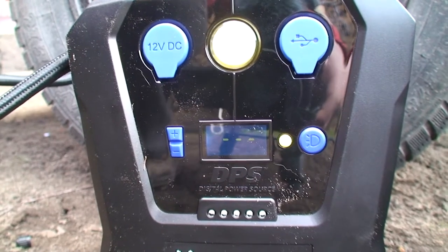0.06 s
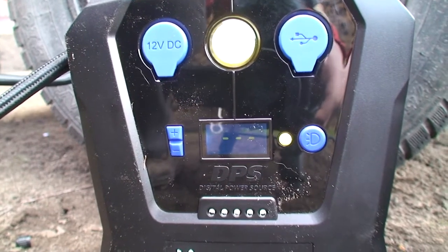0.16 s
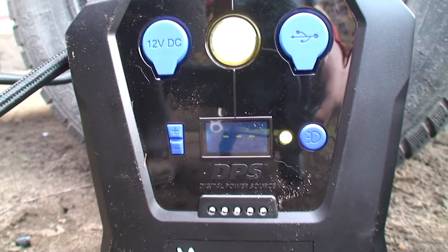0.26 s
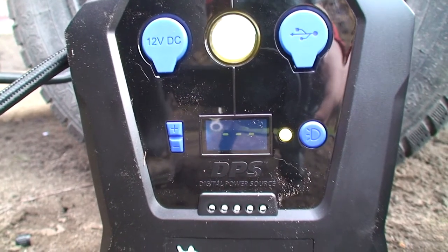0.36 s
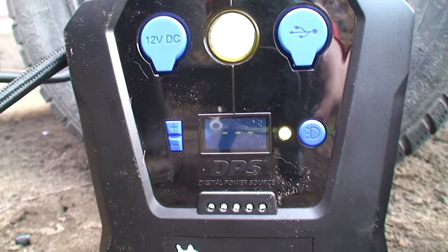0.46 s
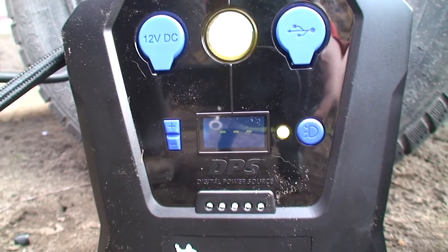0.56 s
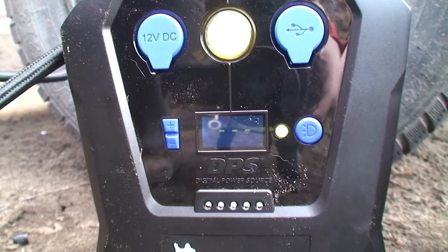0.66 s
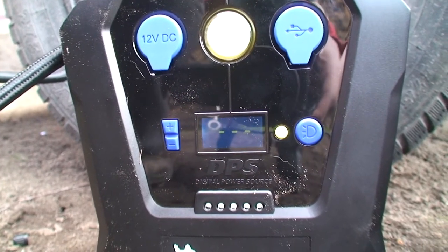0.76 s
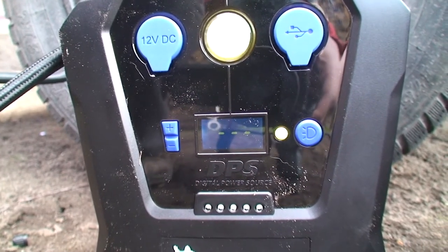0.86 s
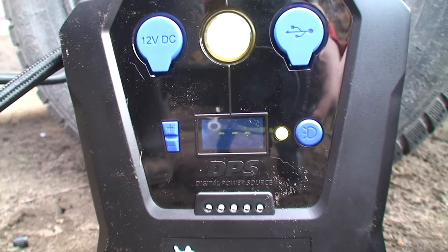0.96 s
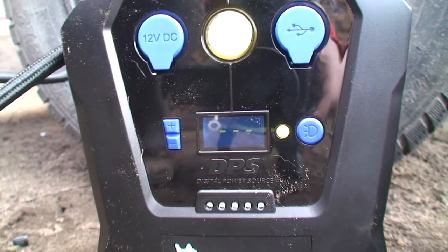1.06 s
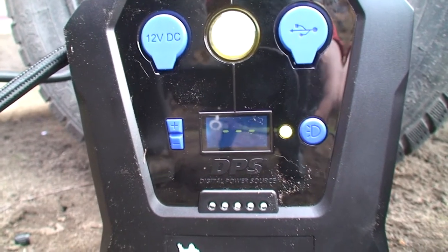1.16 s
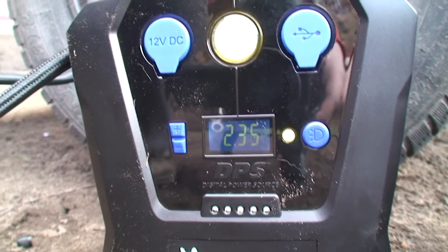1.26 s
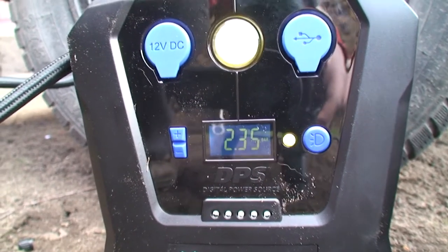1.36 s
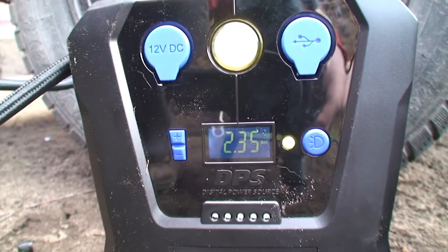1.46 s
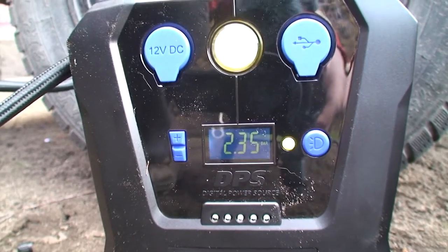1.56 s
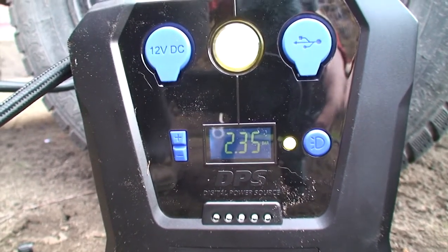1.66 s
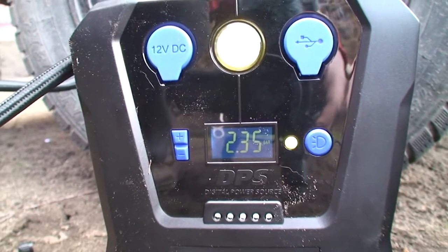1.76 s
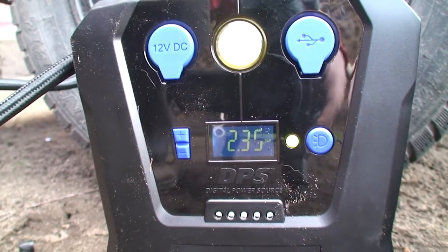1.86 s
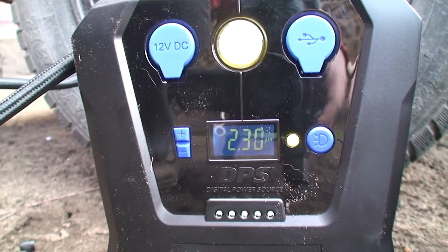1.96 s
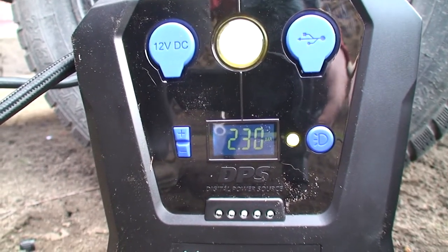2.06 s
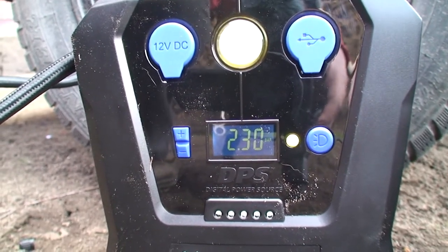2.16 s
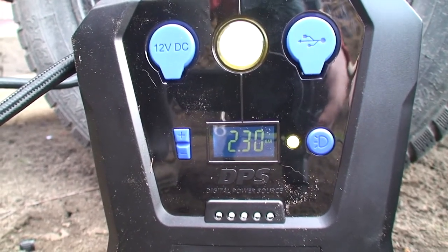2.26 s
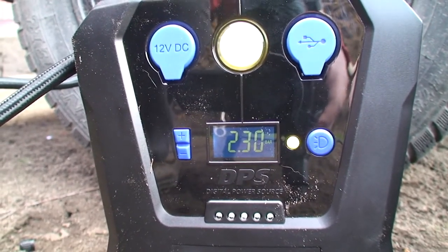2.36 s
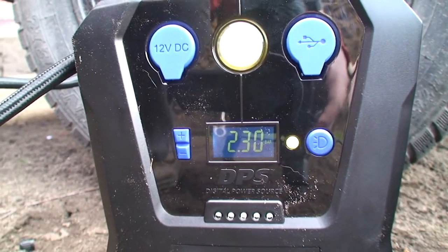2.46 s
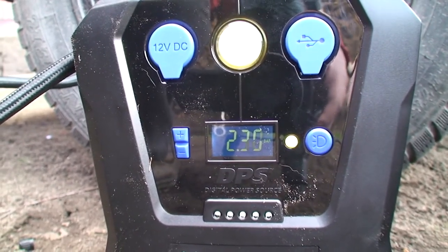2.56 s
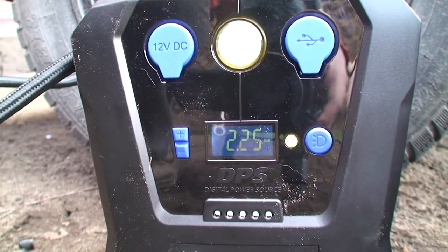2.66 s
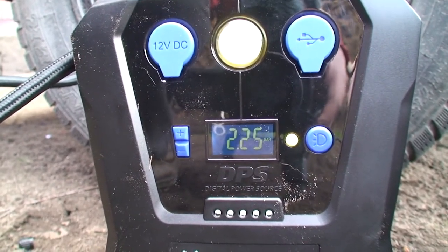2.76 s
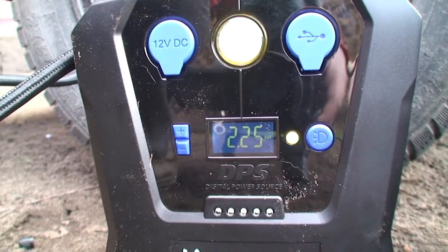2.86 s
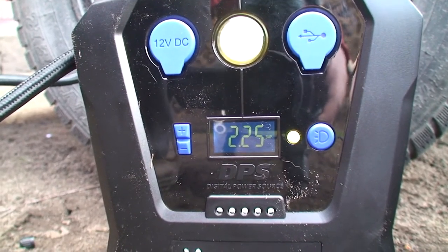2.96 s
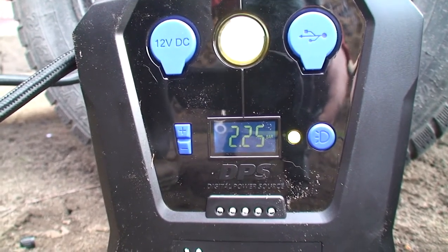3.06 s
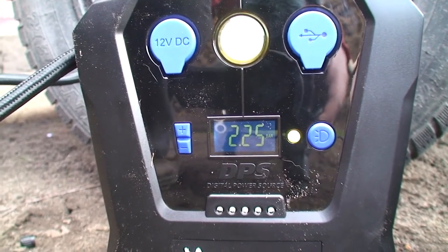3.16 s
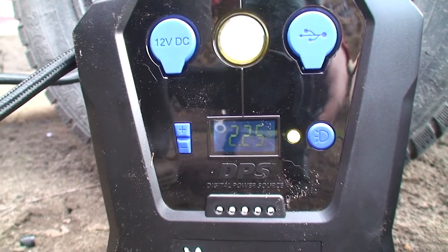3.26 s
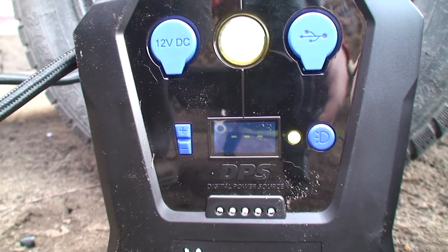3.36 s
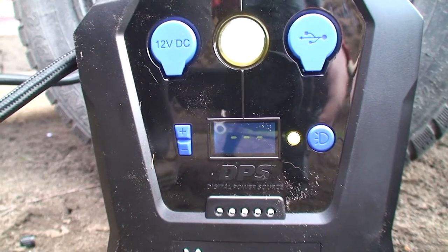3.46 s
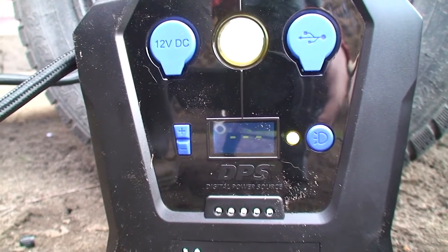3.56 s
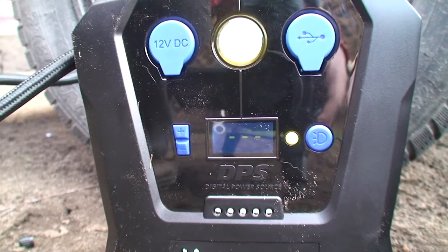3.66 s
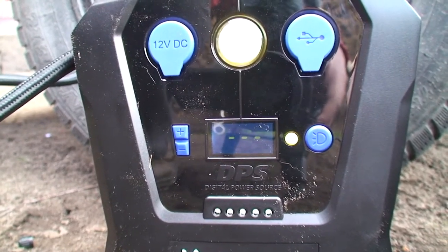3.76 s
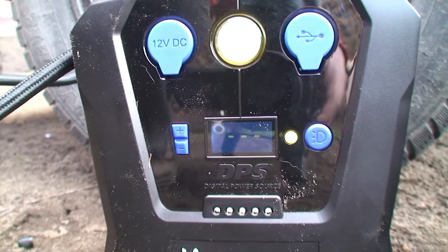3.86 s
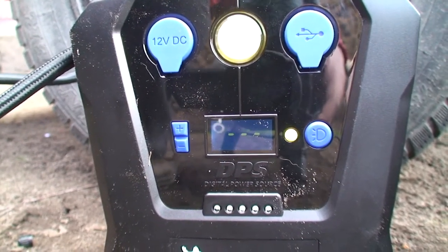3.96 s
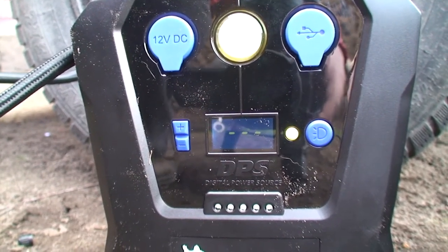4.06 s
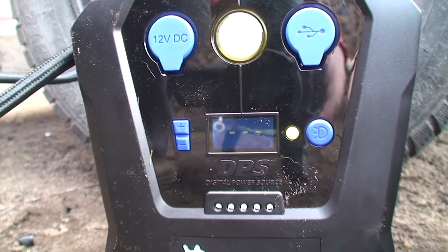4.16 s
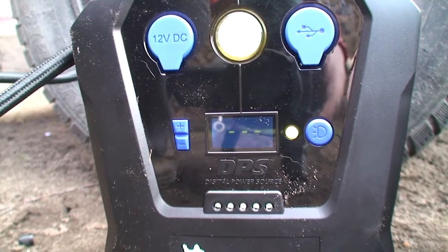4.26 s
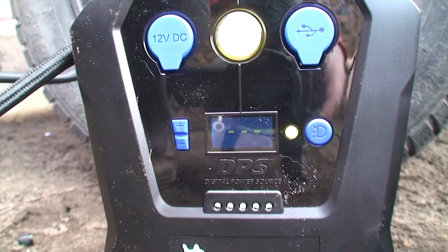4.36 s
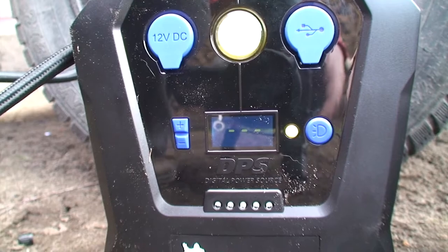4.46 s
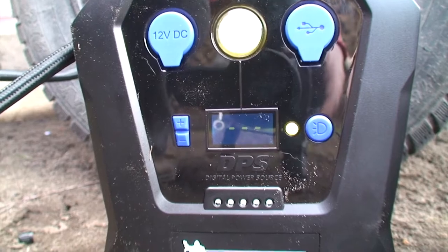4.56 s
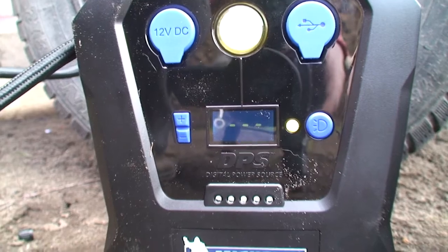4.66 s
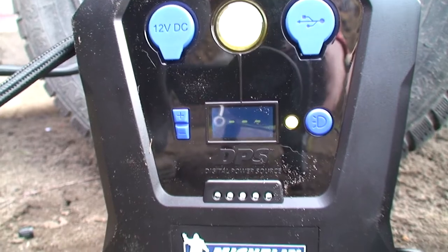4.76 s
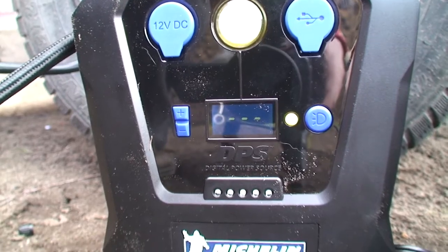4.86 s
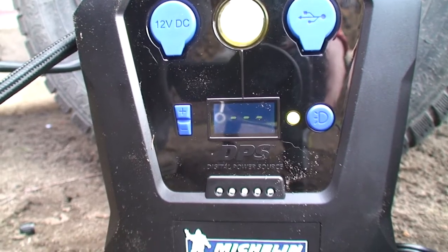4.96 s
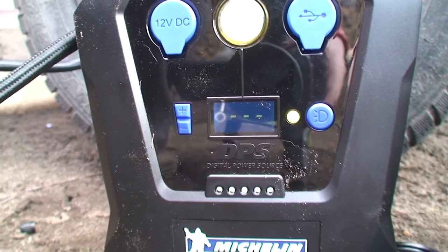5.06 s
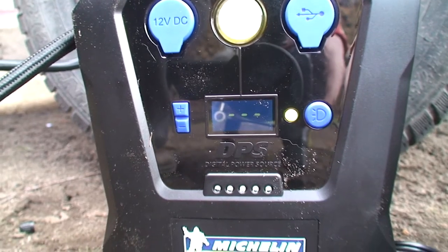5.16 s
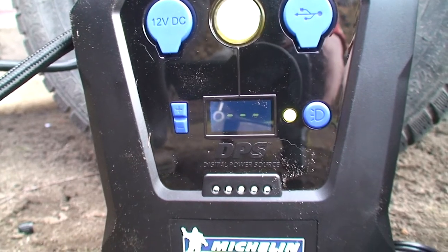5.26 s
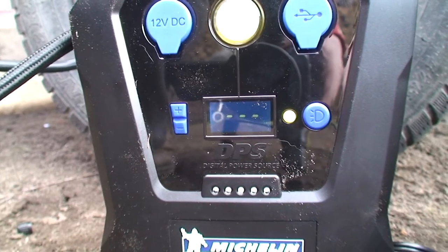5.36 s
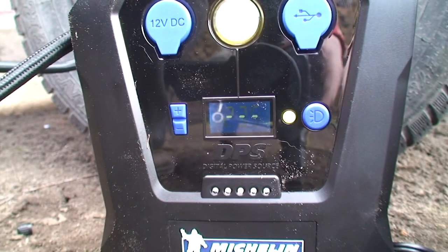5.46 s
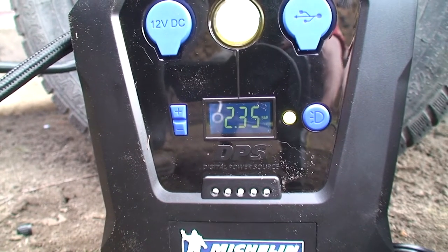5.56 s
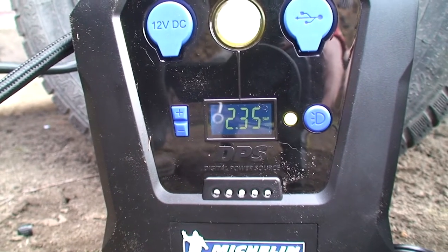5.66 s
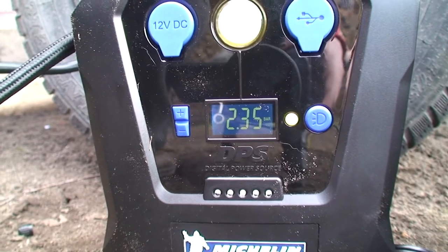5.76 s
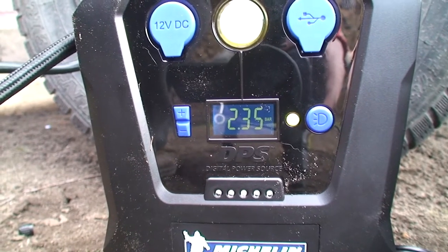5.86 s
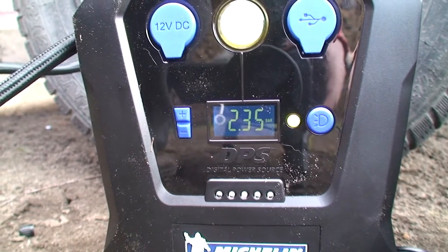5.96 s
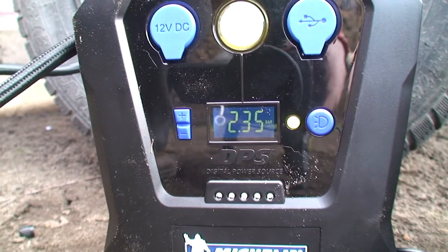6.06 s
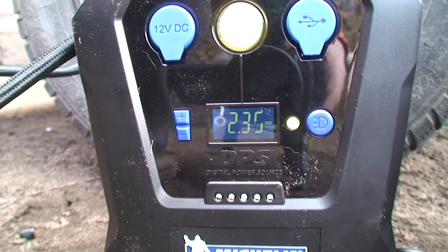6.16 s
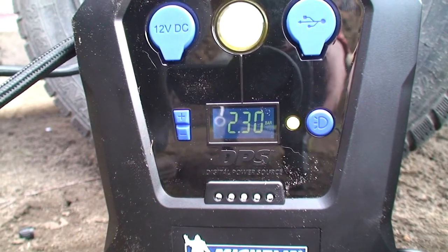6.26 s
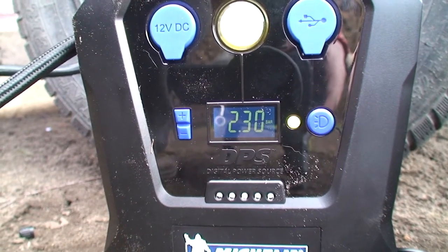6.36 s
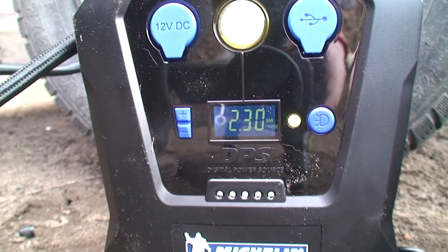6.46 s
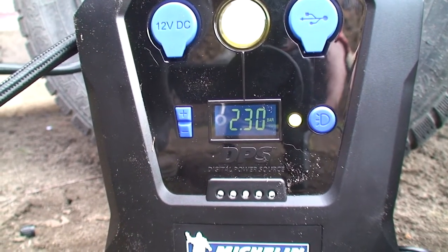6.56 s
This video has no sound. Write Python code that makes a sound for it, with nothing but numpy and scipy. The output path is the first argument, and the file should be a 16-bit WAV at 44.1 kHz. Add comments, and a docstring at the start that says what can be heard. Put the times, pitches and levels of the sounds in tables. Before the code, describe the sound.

Outdoors, a portable air pump buzzes and chatters in two steady runs, each coasting to rest with a brief whirr and clacks.

```python
"""Small electric tyre compressor

It runs close by outdoors, stops, runs again and coasts to rest. A motor geared 23:5 drives one piston:
each stroke knocks, and gears and valves chatter through the plastic case. Pitch and loudness follow the
crank, which spins up at switch-on and is braked by the tyre's pressure at switch-off. The pauses reveal
open air, a low hum, a distant bird and a faint rustle. Two soft thumps fall in the second run."""
import sys
import numpy as np
from scipy import signal
from scipy.fft import rfft, irfft, next_fast_len
from scipy.io import wavfile

SR = 44100
rng = np.random.default_rng(int(sys.argv[2]) if len(sys.argv) > 2 else 0)


def unload_wav(signal):
    """Save mono or channel-first audio to the path in sys.argv[1] as 16-bit WAV at rate SR, clipped to [-1, 1]."""
    wavfile.write(
        sys.argv[1],
        SR,
        np.round(np.clip(np.atleast_2d(signal).T, -1, 1) * 32767).astype(np.int16),
    )


N = 291501
TIME = np.arange(N) / SR

# The motor's two runs: on_s, off_s, at_rest_s, speed_turns_per_s, start_position_turns
RUNS = [(-1, 1.0684, 1.298, 43.878, 3.42), (3.2235, 5.3303, 5.603, 44.021, .215)]


def amp(db):
    """Turns decibels into a multiplier."""
    return np.exp(np.asarray(db) * (np.log(10) / 20))


def unit(x):
    """Scales x to an average (rms) level of 1."""
    return x / np.sqrt(np.mean(x ** 2) + 1e-20)


def running_level(x):
    """Scales x to an average (rms) level of 1 while the motor runs."""
    powered = np.any([(TIME > on) & (TIME < off) for on, off, *_ in RUNS], axis=0)
    return x / np.sqrt(np.mean(x[powered] ** 2))


def along(points, hz):
    """Reads between (pitch_hz, value) points, with octaves evenly spaced."""
    pitches, values = np.transpose(points)
    return np.interp(np.log(hz + 1), np.log(pitches + 1), values)


def filtered(x, response):
    """Scales each frequency in x by response(hz)."""
    size = next_fast_len(N + 4096, real=True)
    hz = np.fft.rfftfreq(size, 1 / SR)
    gain = np.repeat(response(hz[::8]), 8, axis=-1)[..., :len(hz)]
    return irfft(rfft(x.astype(np.float32), size) * gain, size)[..., :N]


def ringing(x, gain, size=16384):
    """Plays x through a body that rings most where gain(hz) is high."""
    hz = np.fft.rfftfreq(size, 1 / SR)
    cepstrum = irfft(np.log(np.maximum(gain(hz), 1e-6)))
    # folding makes the ring follow each hit, never lead it
    cepstrum[1:size // 2] *= 2
    cepstrum[size // 2 + 1:] = 0
    ring = irfft(np.exp(rfft(cepstrum)))[:size // 2]
    return signal.fftconvolve(x, ring)[:N]


def widen(mid, side, spread):
    """Makes left and right from a sound and its scattered part."""
    side = filtered(side, lambda hz: amp(along(spread, hz)))
    return np.array([mid + side, mid - side])


def wobble(rate):
    """A random curve with rate new values a second."""
    knots = rng.standard_normal(int(N / SR * rate) + 2)
    return np.interp(TIME * rate, np.arange(len(knots)), knots)


def sine(cycles):
    """A sine wave from its count of cycles."""
    return np.sin((2 * np.pi * (cycles - np.floor(cycles))).astype(np.float32))


def note(length_s, hz):
    """A tone that swells and fades."""
    t = np.arange(int(length_s * SR)) / SR
    return np.sin(np.pi * t / length_s) * sine(hz * t)


def add(track, start_s, sound):
    """Lays a short sound into the track."""
    track[round(start_s * SR):][:len(sound)] += sound


def crank(spin_up_s=.0338, sag_hz_per_s=.174, brake_s=.1057, brake_shape=1.76):
    """The crank's turns so far, share of speed reached since switch-on and share kept since switch-off."""
    turns, reached, kept = np.zeros((3, N))
    for on, off, _, speed, position in RUNS:
        t = np.arange(N - round(on * SR)) / SR
        rise = 1 - np.exp(-t / spin_up_s)
        fall = np.exp(-(np.maximum(t + on - off, 0) / brake_s) ** brake_shape)  # gentle, then fast
        loaded_speed = speed - sag_hz_per_s * t  # slows as the pressure builds
        travel = position + np.cumsum(loaded_speed * rise * fall) / SR
        span = min(len(t), N)
        turns[-span:], reached[-span:], kept[-span:] = travel[-span:], rise[-span:], fall[-span:]
    return turns, reached, kept


def piston(turns, speed, speed_power=0.72, scatter_db=-0.5, lag_radians=.3):
    """One push a turn, softer at low speed, rings the low notes of the case."""
    # How the case answers a stroke: pitch_hz, relative_db
    knock = [(44, -50), (88, -40), (131, -41.5), (175, -39.5), (219, -38.5), (262, -46), (306, -39),
             (350, -36.5), (394, -31), (438, -26), (481, -35), (525, -28.5), (569, -39), (612, -40),
             (656, -57), (700, -26.5), (744, -45.5), (788, -44.5), (831, -40.5), (875, -41.5)]
    strokes = np.flatnonzero(np.diff(np.floor(turns)) > 0)
    pushes = np.zeros(N)
    pushes[strokes] = speed[strokes] ** speed_power * amp(scatter_db * rng.standard_normal(len(strokes)))
    lags = lag_radians * rng.standard_normal(len(knock))  # the panels move slightly out of step
    pushes = filtered(pushes, lambda hz: np.exp(1j * np.interp(hz, np.transpose(knock)[0], lags)))
    low_band = lambda hz: 1 / np.sqrt((1 + (hz / 950) ** 20) * (1 + (36 / (hz + 1)) ** 8))
    return running_level(ringing(pushes, lambda hz: amp(along(knock, hz)) * low_band(hz)))


def case(hz):
    """How strongly the case and cylinder ring at each frequency."""
    # Their ringing notes: pitch_hz, half_width_hz, relative_db
    resonances = [(167, 100, -16), (380, 42, -10), (533, 99, 0), (776, 59, 2.5), (1086, 110, -0.5),
                  (1141, 29, -4), (1290, 90, -1), (1582, 100, -2.2), (1720, 390, -3.5), (2060, 170, -4),
                  (2280, 49, -2.5), (2552, 110, -3), (2737, 120, -4), (3057, 62, -1.5), (3372, 85, -6),
                  (3575, 38, -1.5), (3783, 130, -2), (4050, 95, -1.5), (4346, 140, -8), (4490, 120, -14.5),
                  (4690, 280, -9), (5490, 320, -11.5), (6134, 520, -8.5), (7340, 986, -19.5),
                  (8610, 397, -21.5), (9560, 220, -19), (10650, 740, -25), (14480, 170, -25),
                  (14710, 5600, -32.5), (15340, 290, -30.5)]
    peaks = (amp(db) / (1 + ((hz - centre) / width) ** 2) for centre, width, db in resonances)
    return np.sqrt(sum(peak ** 2 for peak in peaks))


def surface(turns, count, size=1024, stretch=8):
    """A rough surface that comes round again after count turns of the crank."""
    ripples = np.exp(2j * np.pi * rng.random(count * size // 2))
    profile = unit(irfft(ripples, count * size * stretch))
    return profile[(turns * size * stretch).astype(int) % len(profile)]


def chatter(turns, crank_db=-5.5, teeth_db=-3.5, air_db=-6, rasp_hz=950, low_hz=110):
    """The crank's fine rasp repeats each turn, the gear teeth every five; rushing air never repeats."""
    rasp = filtered(surface(turns, count=1), lambda hz: 1 / np.sqrt(1 + (rasp_hz / (hz + 1)) ** 8))
    teeth = surface(turns, count=5)
    rub = amp(crank_db) * rasp + amp(teeth_db) * teeth + amp(air_db) * rng.standard_normal(N)
    radiated = lambda hz: case(hz) / np.sqrt(1 + (low_hz / (hz + 1)) ** 4)  # small case, little bass
    return running_level(ringing(rub, radiated))


def gear_whine(turns, waver_db=0.1, lag_turns=.03, play_turns=.0012, throb_below=16):
    """Tones locked to the shafts: low ones swell together each stroke; loose gears blur the high ones."""
    # The gears' tones: multiple_of_crank_speed, relative_db
    tones = [(11.6, -42), (12.8, -45), (13.8, -30), (14.8, -29.5), (15.8, -31.5), (16.4, -32.5),
             (16.6, -44.5), (16.8, -39.5), (18.4, -36.5), (25.8, -36.5), (27.6, -32), (28.8, -33),
             (37, -41), (38, -36), (39, -31), (43, -35), (52, -34.5), (58, -36), (81, -32.5), (100, -30)]
    angle = turns - lag_turns + play_turns * wobble(40)
    shared_phase = rng.random()
    tone = lambda multiple: sine(multiple * angle + shared_phase + rng.random() * (multiple > throb_below))
    return np.sqrt(2) * sum(amp(db + waver_db * wobble(20)) * tone(multiple) for multiple, db in tones)


def flare(x, turns, gear_ratio=23 / 5, tight_turns=0.78, size=512):
    """Parts of the sound flare each turn, most when the small off-centre gear presses tightest."""
    # The flares: position_turns, half_width_turns, centre_hz, half_width_octaves, lift_db, sway_share
    flares = [(.9, .1, 1600, .35, 6, .25), (.94, .06, 3850, .3, 6, .05), (.62, .3, 4050, .12, 8.5, .1),
              (.7, .17, 6100, .3, 7, .2), (.74, .1, 2400, .22, 6.5, .3)]
    angle = np.arange(5 * size) / size  # the pattern spans five turns
    place = (turns * size).astype(int) % len(angle)
    pressure = np.cos(2 * np.pi * (gear_ratio * angle - tight_turns))
    out = x.copy()
    for position, width, centre_hz, octaves, lift_db, sway in flares:
        gate = np.exp(-(((angle - position + .5) % 1 - .5) / width) ** 2)
        swell = unit(1 + (amp(lift_db) - 1) * gate * (1 + sway * pressure))
        band = filtered(x, lambda hz: np.exp(-(np.log2((hz + 1) / centre_hz) / octaves) ** 2))
        out += (swell - 1)[place] * band
    return out


def worn_teeth(turns, at_turns=.86, db=-12, ring_hz=1625, fade_s=0.057, scatter_db=1.5):
    """One worn pair of teeth meets every fifth turn and pings the cylinder."""
    meetings = np.flatnonzero(np.diff(np.floor((turns + 1 - at_turns) / 5)) > 0)
    t = np.arange(SR // 10) / SR
    ping = amp(-60 * t / fade_s) * (1 - np.exp(-t * ring_hz / 2)) * sine(ring_hz * t)
    track = np.zeros(N)
    for at, scatter in zip(meetings, rng.standard_normal(len(meetings))):
        add(track, at / SR, amp(db + scatter_db * scatter) * ping)
    return track


def gear_load(turns, reached, kept, slack_db=32, bite_at_turns=.62, bite_width_turns=0.17):
    """Faster gears are louder; as they coast, the chatter breaks into one burst a turn."""
    bite = np.exp(-(((turns - bite_at_turns + .5) % 1 - .5) / bite_width_turns) ** 2)
    gaps = amp(-slack_db * (1 - kept) ** 2.2 * (1 - bite))
    return reached ** 1.5 * kept ** 0.6 * gaps


def compressor(knock_db=-22.0, chatter_db=-16.5, whine_db=-2.0):
    """The crank drives knock, chatter, whine and ping; the flares fade as it coasts."""
    turns, reached, kept = crank()
    load = gear_load(turns, reached, kept)
    plain = amp(chatter_db) * chatter(turns) + amp(whine_db) * gear_whine(turns)
    gears = kept * flare(plain, turns) + (1 - kept) * plain
    direct = amp(knock_db) * piston(turns, reached * kept) + load * (gears + worn_teeth(turns))
    scattered = load * amp(chatter_db) * chatter(turns)
    return np.array([direct, scattered])


def free_rotor(db=-15, fade_db_per_s=102, stop_db_per_s=419.5, attack_s=0.12, attack_shape=4.2):
    """Loudness of the whirr: it rises after switch-off, fades, and dies once the rotor rests."""
    level = np.zeros(N)
    for _, off, rest, *_ in RUNS:
        coasting, resting = np.maximum(TIME - off, 0), np.maximum(TIME - rest, 0)
        attack = 1 - np.exp(-(coasting / attack_s) ** attack_shape)
        level += attack ** 2 * amp(db - fade_db_per_s * coasting - stop_db_per_s * resting)
    return level


def whirr(treble_hz=2200, treble_power=1.3, flutter_db=2.5):
    """With the power off, the motor's rotor whirrs on unevenly, duller as it fades."""
    # Tone colour of the whirr: pitch_hz, relative_db
    colour = [(88, -51), (150, -24.5), (283, -10.5), (364, -4), (441, -13), (515, -1.5), (757, -1),
              (972, -15), (1510, -5.5), (1840, -18.5), (3540, -22.5), (3820, -25), (4460, -22.5),
              (7500, -37), (15000, -50.5)]
    level = free_rotor() * amp(flutter_db * wobble(130))
    treble_level = level.max() * (level / level.max()) ** treble_power
    noise = unit(filtered(rng.standard_normal((2, N)), lambda hz: amp(along(colour, hz))))
    treble = filtered(noise, lambda hz: 1 / (1 + (treble_hz / (hz + 1)) ** 4))
    return level * (noise - treble) + treble_level * treble


def loose_parts(thin_hz=500):
    """Loose parts clack against the case as the piston starts or comes to rest."""
    # The clacks: start_s, level_db, fade_s (to fall 60 dB), dull_above_hz
    clacks = [(1.126, -14.5, .07, 2996), (1.168, -20.5, 0.055, 2192), (1.197, -34, .06, 2477),
              (1.356, -51, .09, 1000), (3.2265, -33, .08, 1830), (5.4, -15, .075, 3210),
              (5.4565, -16, .04, 1987), (5.482, -25.5, 0.12, 3000), (5.6295, -42, .055, 2588)]
    sound = np.zeros((2, N))
    t = np.arange(SR // 10) / SR
    for start_s, db, fade_s, dull_hz in clacks:
        cut = lambda hz: np.sqrt((1 + (hz / dull_hz) ** 6) * (1 + (thin_hz / (hz + 1)) ** 4))
        for track in sound:
            burst = amp(db - 60 * t / fade_s) * rng.standard_normal(len(t))
            add(track, start_s, ringing(burst, lambda hz: unit(case(hz) / cut(hz)), size=4096))
    return sound


def outdoors(air_db=-61.0, hum_hz=70, hum_db=-57.0, lean_db=-3.0, waver_db=-1.0):
    """Open air from all sides and a low hum to the right."""
    # Tone colour of the air: pitch_hz, relative_db
    colour = [(20, -9), (45, 0.5), (100, 1), (200, -1), (280, -3.5), (390, -4.5), (510, -12), (950, -14),
              (1700, -20), (4000, -23), (15500, -26)]
    # How wide the air sounds: pitch_hz, side_db
    spread = [(60, -14), (150, -8), (380, -3), (950, -4), (2380, -2), (6000, -0.5), (15000, 0)]
    mid, side = unit(filtered(rng.standard_normal((2, N)), lambda hz: amp(along(colour, hz))))
    air = amp(air_db) * widen(mid, side, spread)
    hum = amp(hum_db + waver_db * wobble(8.9)) * np.sqrt(2) * sine(hum_hz * TIME + .03 * wobble(5))
    return air + amp([[lean_db], [-lean_db]]) * hum


def bird(flutter_db=3):
    """A far bird's thin notes flutter on their way."""
    # The notes: start_s, length_s, pitch_hz, level_db
    notes = [(1.623, 0.075, 4670, -71.5), (1.79, 0.13, 3784, -70), (2.089, .2, 4620, -75),
             (2.305, .08, 3694, -75)]
    track = np.zeros(N)
    for start_s, length_s, hz, db in notes:
        add(track, start_s, amp(db) * note(length_s, hz))
    return track * amp(flutter_db * wobble(60))


def rustle(start_s=1.88, length_s=.76, centre_hz=3100, octaves=.8, db=-73):
    """One faint swell of rustling."""
    arch = np.sin(np.pi * np.clip((TIME - start_s) / length_s, 0, 1))
    band = lambda hz: np.exp(-(np.log2((hz + 1) / centre_hz) / octaves) ** 2)
    return amp(db) * arch * unit(filtered(rng.standard_normal(N), band))


def bumps(length_s=.035):
    """Soft thumps, each a few cycles of a low tone."""
    # The thumps: start_s, pitch_hz, level_db
    thumps = [(4.763, 104.5, -32.5), (4.808, 119.6, -26.5)]
    track = np.zeros(N)
    for start_s, hz, db in thumps:
        add(track, start_s, amp(db) * note(length_s, hz))
    return track


def scene():
    """Places the machine between left and right and adds the sounds around it."""
    # How wide the machine sounds: pitch_hz, side_db
    spread = [(100, -16), (400, -11), (700, -10.5), (1500, -17.5), (3000, -13.5), (6000, -11.5),
              (9000, -8.5), (15000, -13)]
    # Which way its sound leans: pitch_hz, left_minus_right_db
    balance = [(60, -0.5), (200, 1), (380, -3), (700, -1.5), (1290, -2), (2380, -0.5), (4400, -0.5),
               (8120, 0.0), (15000, -2)]
    direct, scattered = compressor() + whirr() + loose_parts()
    machine = widen(direct, scattered, spread)
    machine = filtered(machine, lambda hz: amp(np.outer([.5, -.5], along(balance, hz))))
    return machine + bumps() + outdoors() + bird() + rustle()


def record(dry, ceiling=1.0, knee=6, top_hz=15950):
    """Rounds off the highest peaks and cuts the treble above top_hz."""
    rounded = dry / (1 + np.abs(dry / ceiling) ** knee) ** (1 / knee)
    return filtered(rounded, lambda hz: hz < top_hz)


dry = scene()
out = record(dry)
unload_wav(out)
```